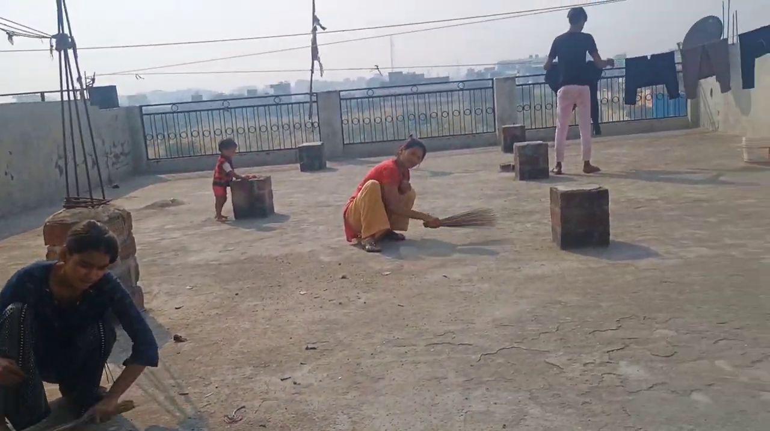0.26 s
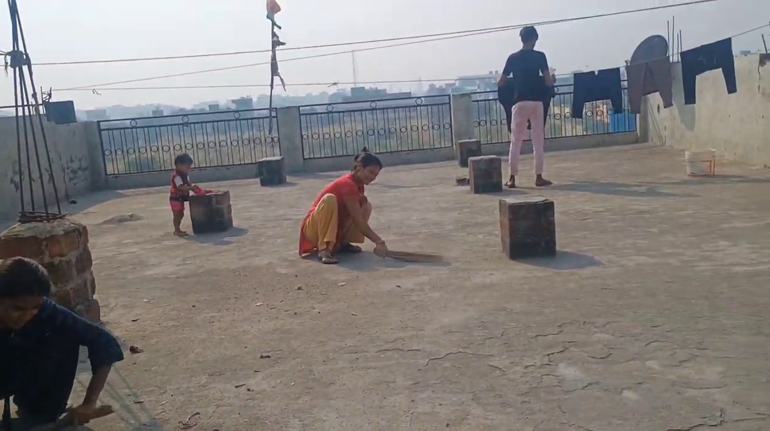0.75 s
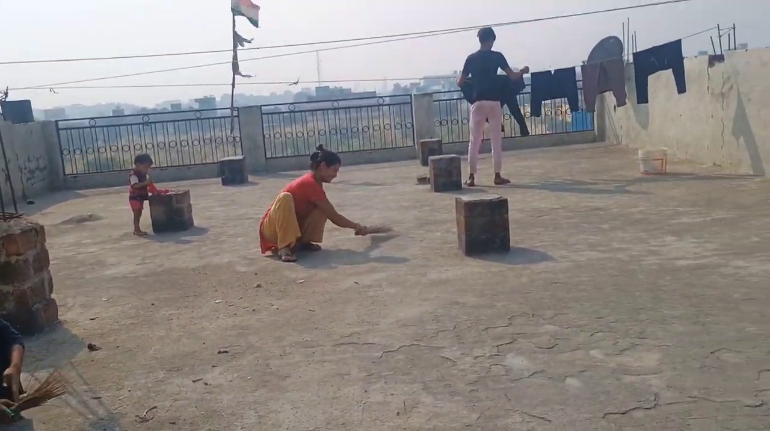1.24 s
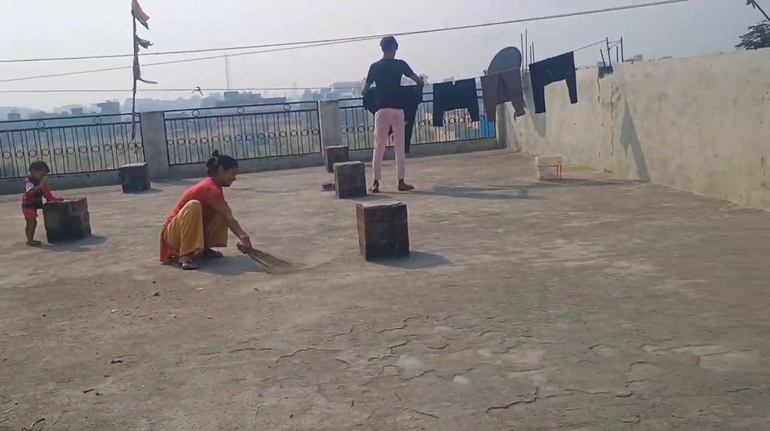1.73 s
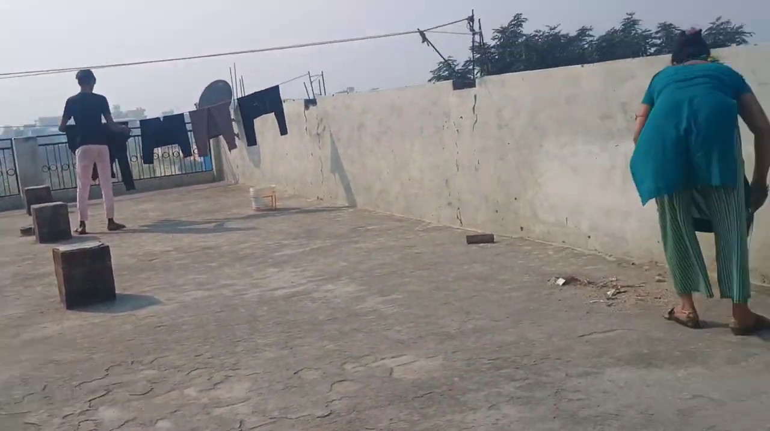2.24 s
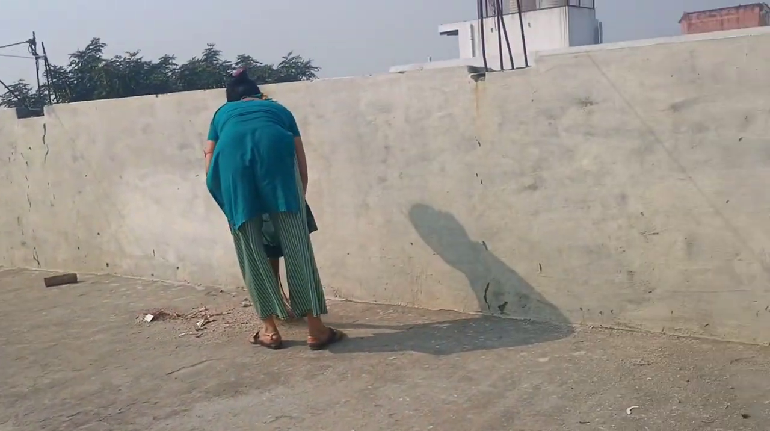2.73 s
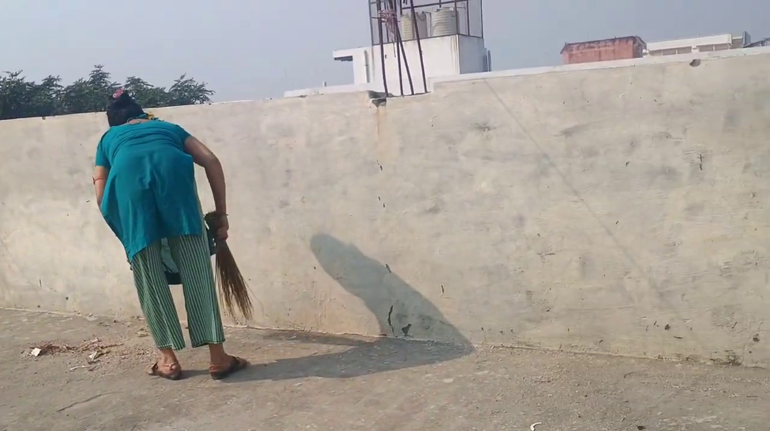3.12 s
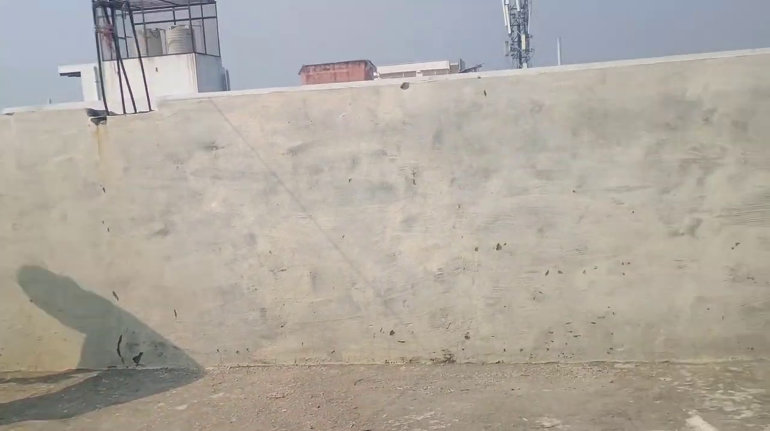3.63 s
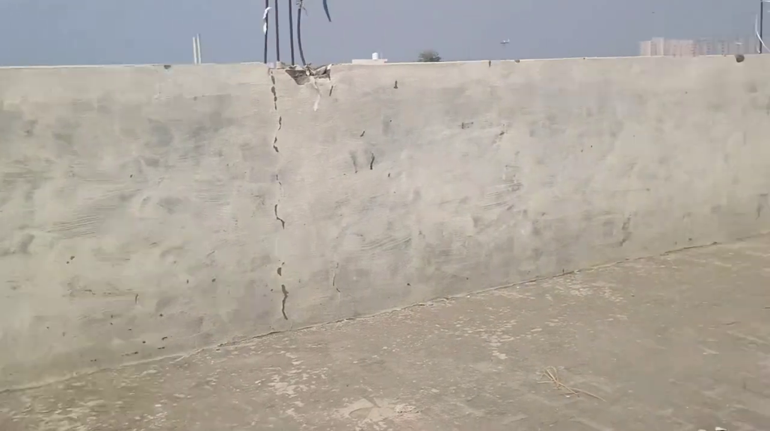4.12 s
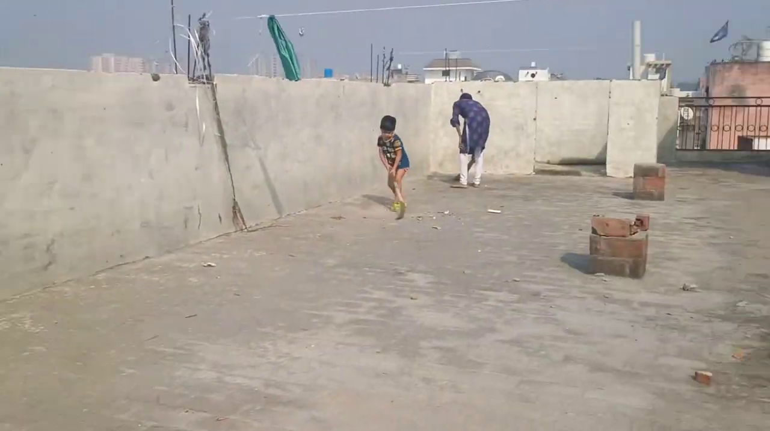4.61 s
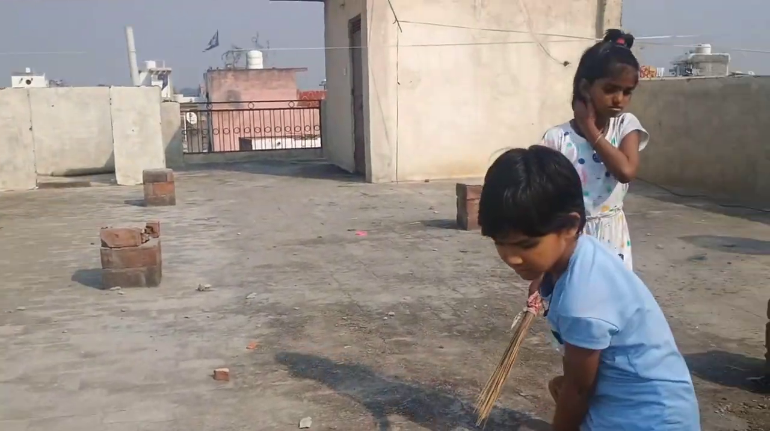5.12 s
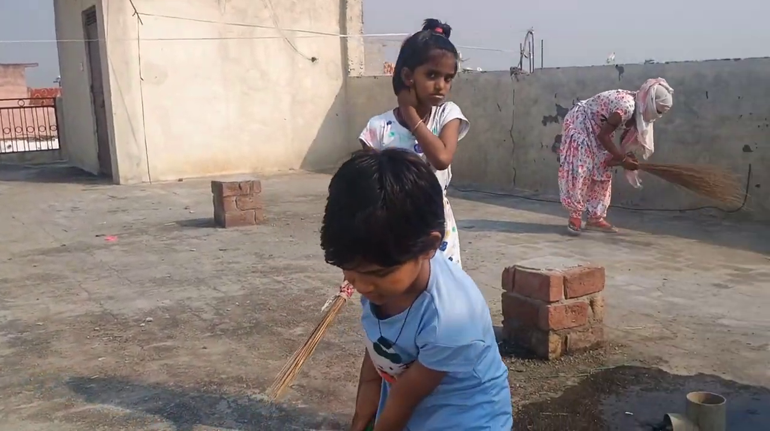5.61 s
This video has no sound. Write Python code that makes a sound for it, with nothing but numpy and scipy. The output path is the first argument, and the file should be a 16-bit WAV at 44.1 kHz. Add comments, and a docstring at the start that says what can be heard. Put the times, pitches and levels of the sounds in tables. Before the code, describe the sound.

Several dry grass brooms sweep a gritty concrete rooftop in crisp, crackling strokes from all sides, over a faint low town rumble.

```python
"""Dry, crackling broom strokes sweep to and fro, with light flicks, scuffs and squeaks over a low town rumble.
Several people sweep a walled concrete rooftop with grass brooms, on all sides of a phone with two ports.
Each stroke drags dry stems over the grit: dense tiny snaps that reach the ports directly and again off
the floor and parapet walls. Catching stems are noise through a resonance; town, breeze and air are
coloured noise."""
import sys
import numpy as np
from scipy import signal
from scipy.fft import rfft, irfft, next_fast_len
from scipy.io import wavfile
from scipy.ndimage import map_coordinates

SR = 44100
rng = np.random.default_rng(int(sys.argv[2]) if len(sys.argv) > 2 else 0)


def file_out(sig):
    """Save sig as 16-bit WAV at sys.argv[1]."""
    # one column per channel
    cols = np.atleast_2d(sig).T
    # limit, then scale
    lim = np.clip(cols, -1, 1)
    pcm = np.round(lim * 32767).astype(np.int16)
    wavfile.write(sys.argv[1], SR, pcm)


N = 258426
TIME = np.arange(N) / SR
TOP_HZ = 15800  # the phone passes nothing much above this
FIRM_DB = -38  # level of a firm stroke
STROKE_TIPS_DB, SIZZLE_PER_DB = -2.5, 0.1  # tip sizzle of a firm stroke, dB per octave; it grows with force
FLICK_S, FLICK_TILT_DB, FLICK_TIPS_DB = 0.095, 3.0, 5  # length; tilt and tip sizzle in dB per octave
STROKE_DIRECT, FLICK_DIRECT = 0.19, 0.4  # share of the energy that arrives without an echo
STROKE_SHADE_DB, FLICK_SHADE_DB = 4.5, 11  # treble difference between ports for a broom at 90 degrees
SHADE_POWER = 6.7  # the shade sets in steeply towards the side
RISE_SHARE = 0.41  # of a sweep's length; the rest is its release
PORT_LAG_MS = 0.493  # between the two ports, for a broom straight to one side
PORT_TILT_DB = 0.77  # per octave: the left port is slightly the brighter


# Full broom strokes around the phone, bearings positive to the right. Level is before tilt and sizzle.
# Columns: hardest_push_s [s], length_s [s], level_db [dB], tilt_db [dB per octave], bearing_deg [degrees]
FULL_STROKES = [(0.02, 0.22, -28.2, 2, -11.5), (0.235, 0.41, -42, 1.5, 83), (0.5, 0.18, -33, 1.1, -20),
                (0.757, 0.44, -36.5, 1.2, 0), (0.961, 0.2, -31, 2.5, -19.5), (1.14, 0.24, -44.5, 0.2, 80),
                (1.35, 0.35, -38, 1, -63), (1.648, 0.33, -36, 0.5, -3.5), (1.845, 0.19, -36.5, 2.1, -29.5),
                (2.144, 0.31, -36.5, 0.4, -73), (2.364, 0.23, -36.5, 2.5, -45),
                (2.53, 0.2, -36.2, 2.0, -42), (2.696, 0.24, -41.5, -0.5, -63),
                (2.918, 0.29, -35, 0.8, 89.5), (3.295, 0.3, -38.7, 1.6, -89), (3.455, 0.36, -38, 0.6, -67),
                (3.72, 0.35, -36, 0.4, 55), (3.867, 0.27, -35, 2.2, 41), (4.034, 0.14, -37.5, 1.0, -46),
                (4.239, 0.5, -51.2, -0.1, -94), (4.558, 0.31, -30.5, 1.8, 72), (4.809, 0.26, -42, 0, -76),
                (4.949, 0.14, -48.5, -3.5, -82), (5.266, 0.31, -35, 2, 39.5), (5.445, 0.23, -33, 0, 21),
                (5.709, 0.41, -46, -0.7, -54)]


def full_strokes():
    """Whole sweeps of the broom; the harder the push, the more the fine tips sizzle."""
    total = np.zeros((2, N))
    for peak_s, length_s, level_db, tilt_db, bearing_deg in FULL_STROKES:
        tips_db = STROKE_TIPS_DB + SIZZLE_PER_DB * (level_db - FIRM_DB)
        total += stroke(peak_s, length_s, level_db, tilt_db, tips_db,
                        bearing_deg, STROKE_SHADE_DB, STROKE_DIRECT)
    return total


# Light flicks of the broom, bearings positive to the right. Level is before tilt and sizzle.
# Columns: hardest_push_s [s], level_db [dB], bearing_deg [degrees]
LIGHT_FLICKS = [(1.538, -46.5, -5), (1.778, -39.5, -30), (2.298, -41.5, -44), (2.808, -44, -84),
                (3.399, -45, -82), (5.128, -44.5, 5.5), (5.78, -50, 72)]


def flicks():
    """Short bright strokes in which only the fine tips brush the floor."""
    total = np.zeros((2, N))
    for peak_s, level_db, bearing_deg in LIGHT_FLICKS:
        total += stroke(peak_s, FLICK_S, level_db, FLICK_TILT_DB, FLICK_TIPS_DB,
                        bearing_deg, FLICK_SHADE_DB, FLICK_DIRECT)
    return total


# Dry grass on concrete: relative spectrum, before each stroke's own tilt.
# Columns: frequency_hz [Hz], level_db [dB]
BRISTLE_SPECTRUM = [(250, -41), (500, -17.5), (850, -16), (1250, -17), (1900, -12.5), (3000, -10),
                    (4100, -6.5), (5000, -6.5), (6300, -3.5), (8200, -0.5), (9500, -1), (13000, -2),
                    (15800, -0.5)]


def stroke(peak_s, length_s, level_db, tilt_db, tips_db, bearing_deg, shade_db, direct,
           tips_hz=8000, shadow_hz=6000):
    """One sweep: the broom presses down, drags and lifts away, heard at both ports."""
    rise_s, fall_s = length_s * RISE_SHARE, length_s * (1 - RISE_SHARE)
    start = int(np.clip((peak_s - 2 * rise_s) * SR, 0, N - SR // 10))
    n = min(next_fast_len(int(2 * length_s * SR) + SR // 20), N - start)
    t = TIME[start:start + n] - peak_s
    pressure = np.exp(-(t / np.where(t < 0, rise_s, fall_s)) ** 2)
    scrape = stems(n) * pressure

    # the direct sound reaches the nearer port first
    hz = bins(n)
    side = np.array([[0.5], [-0.5]])  # left, right
    lag_s = PORT_LAG_MS / 1000 * np.sin(np.radians(bearing_deg))
    direct_sound = rfft(scrape) * np.exp(-2j * np.pi * hz * side * lag_s)
    echoes = rfft(walls(scrape))
    heard = np.sqrt(direct) * direct_sound + np.sqrt(1 - direct) * echoes

    # the bristles' colour, tilted, with the sizzle of the fine tips on top
    octaves = np.log2(np.clip(hz, 1000, TOP_HZ) / tips_hz)
    bristles = unit(shape(BRISTLE_SPECTRUM, hz) * (hz < TOP_HZ))
    colour = bristles * undb(tilt_db * octaves + tips_db * np.maximum(octaves, 0))

    # the phone's body shades the far port, mostly in the treble; half is cut there, half added nearby
    pan_db = -shade_db * np.sign(bearing_deg) * abs(bearing_deg / 90) ** SHADE_POWER
    treble = np.minimum(hz / shadow_hz, 1)
    shadow = undb(side * (pan_db * treble + PORT_TILT_DB * octaves))

    out = np.zeros((2, N))
    out[:, start:start + n] = irfft(heard * colour * shadow, n) * undb(level_db)
    return out


def stems(n, snaps_per_s=7000, spread_db=3.0, rub=0.82,
          judder_db=0.4, judder_rate=150, snag_db=0.5, snag_rate=40):
    """Stem tips slip over grit in uneven snaps above a smooth rub; tufts snag and judder together."""
    sizes = undb(spread_db * np.minimum(rng.exponential(size=n), 6))
    signs = rng.choice([-1, 1], n)
    slips = rng.random(n) < snaps_per_s / SR
    snaps = unit(sizes * signs * slips)
    grip = undb(judder_db * walk(n, judder_rate) + snag_db * walk(n, snag_rate))
    return unit((snaps + rub * rng.standard_normal(n)) * grip)


def walls(x, floor_s=0.00047, parapet_s=0.0085, parapet_share=0.86):
    """Echoes off floor and parapets; each stem has its own path, so only the energy's outline survives."""
    t = TIME[:SR // 10]
    early = np.exp(-t / floor_s)
    late = np.exp(-t / parapet_s)
    spread = (1 - parapet_share) * early / early.sum() + parapet_share * late / late.sum()
    energy = np.maximum(signal.fftconvolve(x ** 2, spread)[:len(x)], 0)
    return np.sqrt(energy) * rng.standard_normal((2, len(x)))


def flex(x, depth_db=1.0, rate=14, band_hz=550):
    """The bundle bends and fans out as it drags, so its colour drifts in small patches."""
    hz, t, frames = signal.stft(x, SR, nperseg=512)
    rows, columns = hz / band_hz, t * rate
    patches = rng.standard_normal((int(rows[-1]) + 2, int(columns[-1]) + 2))
    grid = np.meshgrid(rows, columns, indexing="ij")
    drift = unit(map_coordinates(patches, grid, order=1))
    return signal.istft(frames * undb(depth_db * drift), SR)[1][:, :N]


# Brief scuffs, scratches and squeaks where stems catch on the grit; length is from peak to 1/e.
# Columns: peak_s [s], length_s [s], pitch_hz [Hz], width_hz [Hz, of each of two stages], level_db [dB]
STEM_CATCHES = [(0.045, 0.087, 920, 700, -56), (.497, 0.015, 5270, 2800, -38.5),
                (0.974, 0.038, 960, 700, -60), (3.333, 0.019, 2430, 477, -48.5),
                (3.39, 0.043, 2420, 600, -56), (3.691, 0.0076, 1940, 330, -45.5),
                (5.552, 0.028, 1510, 1500, -51.5), (5.813, 0.04, 785, 350, -62)]


def catches():
    """Stems stick and slip, and the friction sounds through a resonance."""
    return sum(ring(*row) for row in STEM_CATCHES)


def bump():
    """One soft low bump, alike at both ports."""
    return ring(peak_s=0.029, length_s=0.062, pitch_hz=233, width_hz=130, level_db=-46.0, channels=1)


def ring(peak_s, length_s, pitch_hz, width_hz, level_db, channels=2):
    """A short swell of friction noise through one resonance, applied twice."""
    hz = bins(N)
    detuning = (hz / pitch_hz - pitch_hz / hz) * pitch_hz / width_hz
    resonance = 1 / (1 + 1j * detuning) ** 2
    rubbed = unit(irfft(rfft(rng.standard_normal((channels, N))) * resonance, N))
    swell = np.exp(-((TIME - peak_s) / length_s) ** 2)
    return rubbed * swell * undb(level_db)


# The distant town's rumble: relative spectrum. Columns: frequency_hz [Hz], level_db [dB]
TOWN_SPECTRUM = [(20, -31), (48, -7), (80, -0.5), (99, 3), (122, -0.5), (160, 1), (205, -1), (245, 2),
                 (285, -5), (350, -13.5), (520, -14), (1000, -41.5), (2500, -26)]
# How the rumble's level moves, before trim and swell. Columns: time_s [s], level_db [dB]
RUMBLE_LEVEL = [(0, -53.2), (.45, -54), (.6, -56.5), (3.5, -57.5), (5.86, -58.5)]


def town(trim_db=-0.35, swell_db=1.1, swell_rate=14):
    """Distant traffic, a low rumble alike at both ports that swells a little at random."""
    level_db = np.interp(TIME, *np.transpose(RUMBLE_LEVEL)) + swell_db * walk(N, swell_rate)
    return coloured(TOWN_SPECTRUM, channels=1) * undb(level_db + trim_db)


# The breeze on each port: relative spectrum. Columns: frequency_hz [Hz], level_db [dB]
BREEZE_SPECTRUM = [(18, -7), (45, 0.5), (75, -3), (130, -15), (300, -9.5), (1000, -60)]


def breeze(level_db=-69, gust_db=2.5, gust_rate=5):
    """A light breeze: low noise, different at each port, fluttering in level at both together."""
    return coloured(BREEZE_SPECTRUM, channels=2) * undb(level_db + gust_db * walk(N, gust_rate))


# Open-air hiss at each port: relative spectrum. Columns: frequency_hz [Hz], level_db [dB]
AIR_SPECTRUM = [(30, -21), (120, -13), (280, -7.5), (400, -1), (550, 2), (1100, -7), (2500, -5),
                (6000, -7.5), (15800, -19)]


def air(level_db=-61.5):
    """Thin, diffuse, steady air noise, different at each port."""
    return coloured(AIR_SPECTRUM, channels=2) * undb(level_db)


def undb(db):
    """Decibels to gain."""
    return 10 ** (np.asarray(db) / 20)


def unit(x):
    """Scale to rms 1."""
    return x / np.sqrt(np.mean(x ** 2) + 1e-18)


def bins(n):
    """Frequencies of an n-sample spectrum, kept above zero."""
    return np.maximum(np.fft.rfftfreq(n, 1 / SR), 1)


def shape(points, hz):
    """Gain of a (Hz, dB) spectrum at the given frequencies."""
    at, db = np.transpose(points)
    return undb(np.interp(np.log(hz), np.log(at), db))


def coloured(points, channels):
    """Unrelated noises with the given spectrum, at rms 1."""
    white = rng.standard_normal((channels, N))
    return unit(irfft(rfft(white) * shape(points, bins(N)), N))


def walk(n, rate):
    """Random wander of rms 1, in straight lines between `rate` knots per second."""
    knots = rng.standard_normal(int(n / SR * rate) + 2)
    return unit(np.interp(np.arange(n) / SR * rate, np.arange(len(knots)), knots))


def scene():
    """All the brooms, a few scuffs and squeaks, one soft bump, then town, breeze and air."""
    sweeping = flex(full_strokes() + flicks())
    background = town() + breeze() + air()
    return sweeping + catches() + bump() + background


def record(dry):
    """The phone cuts the top steeply."""
    low_pass = signal.ellip(10, 0.1, 80, TOP_HZ, fs=SR, output="sos")
    return signal.sosfilt(low_pass, dry)


dry = scene()
out = record(dry)
file_out(out)
```